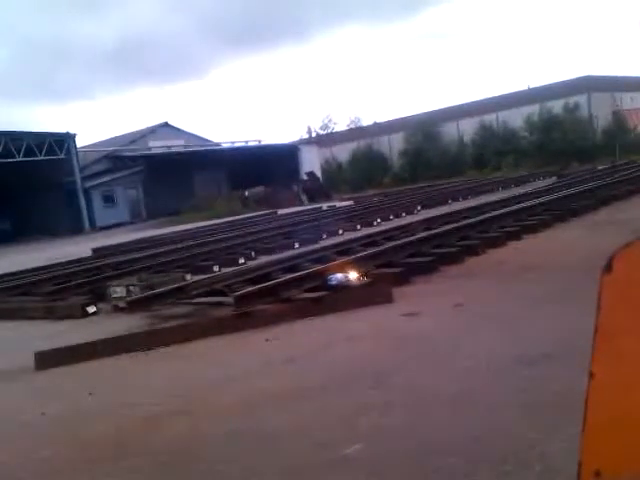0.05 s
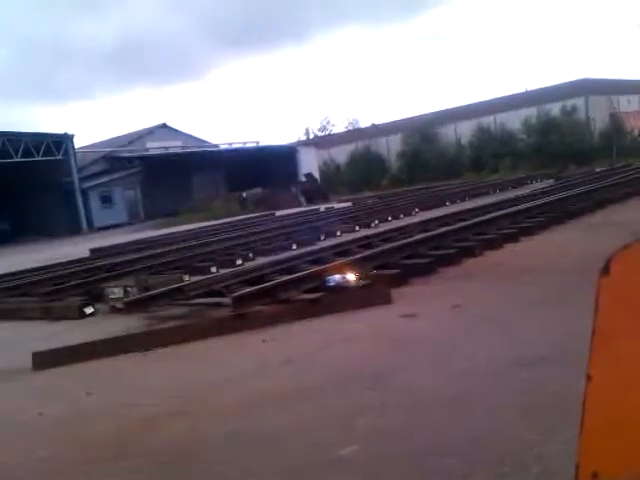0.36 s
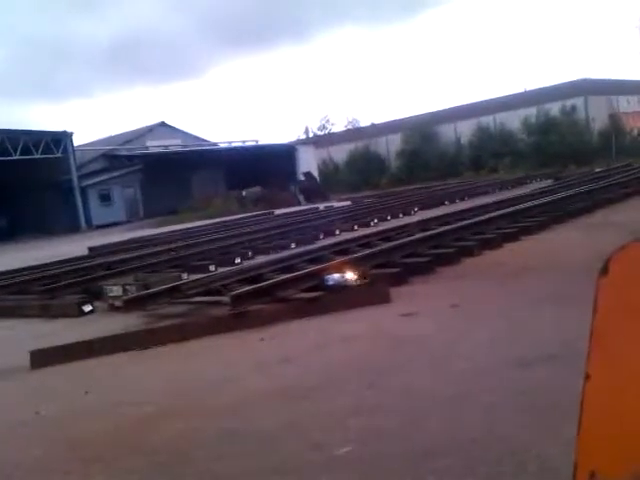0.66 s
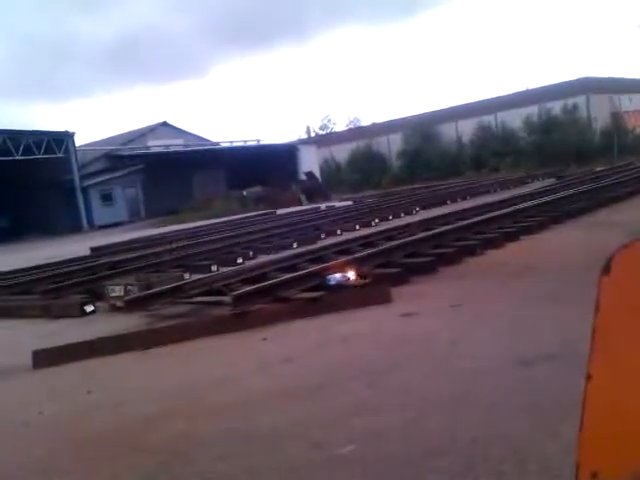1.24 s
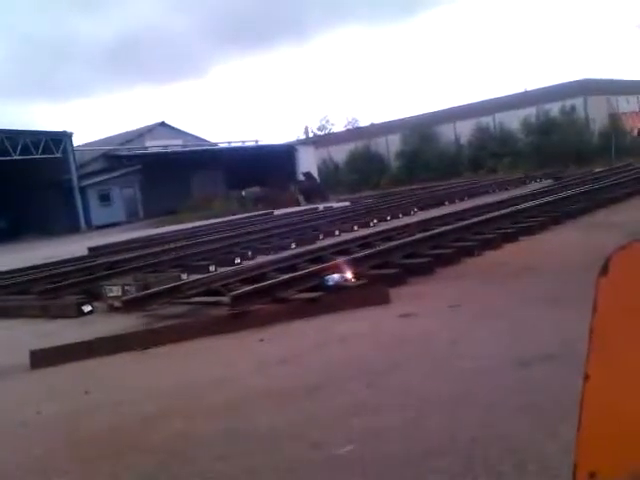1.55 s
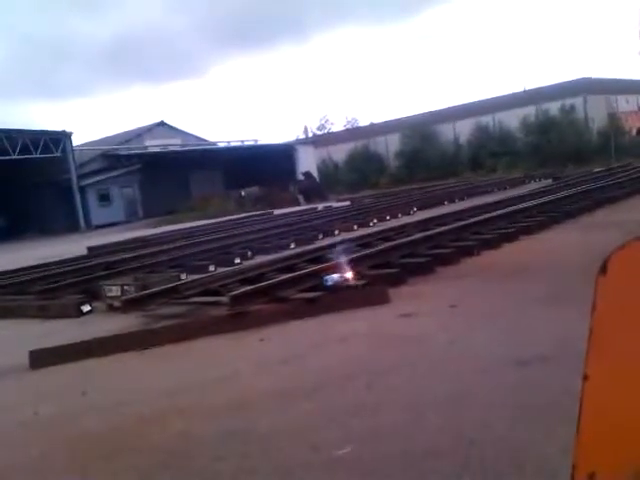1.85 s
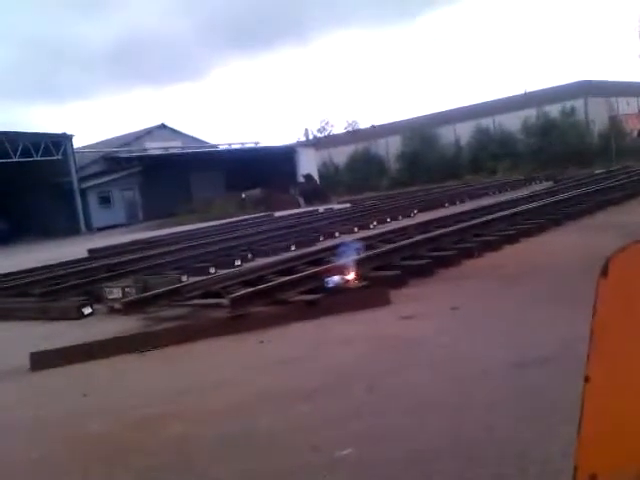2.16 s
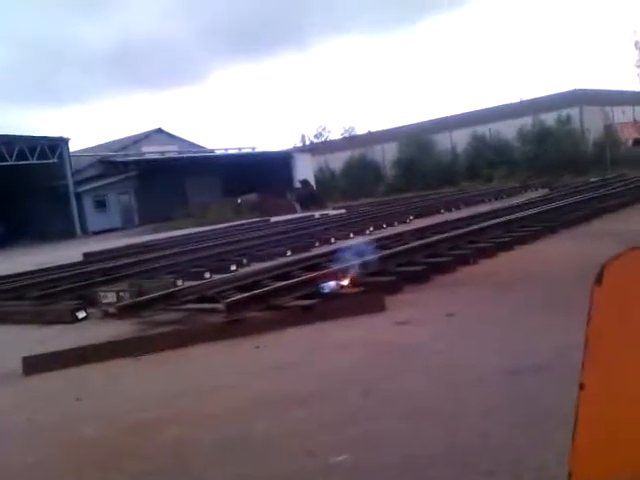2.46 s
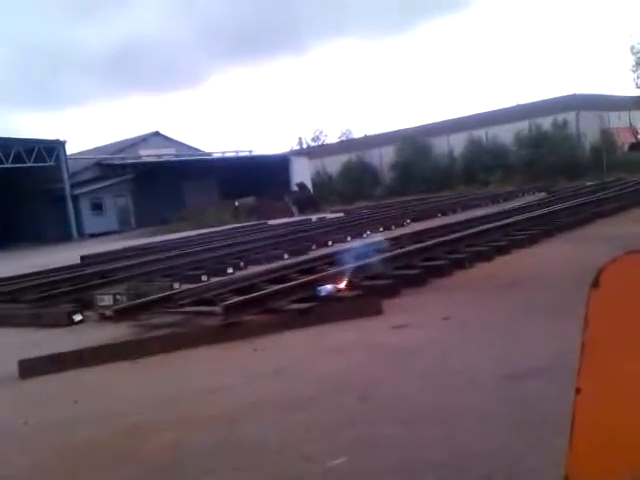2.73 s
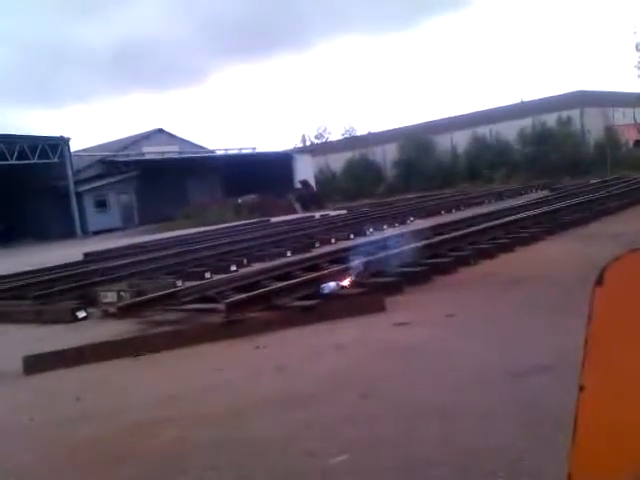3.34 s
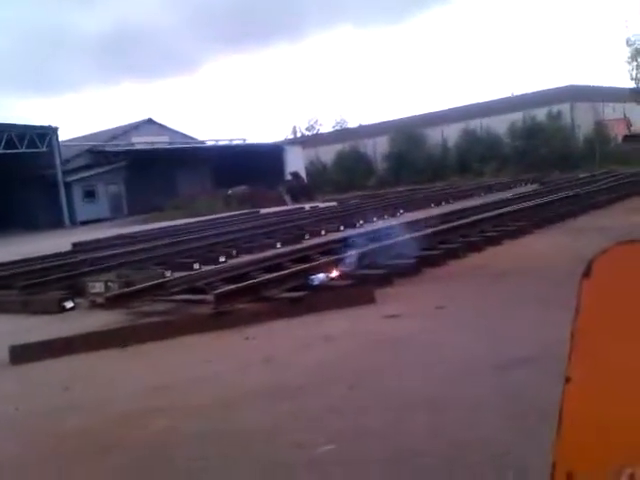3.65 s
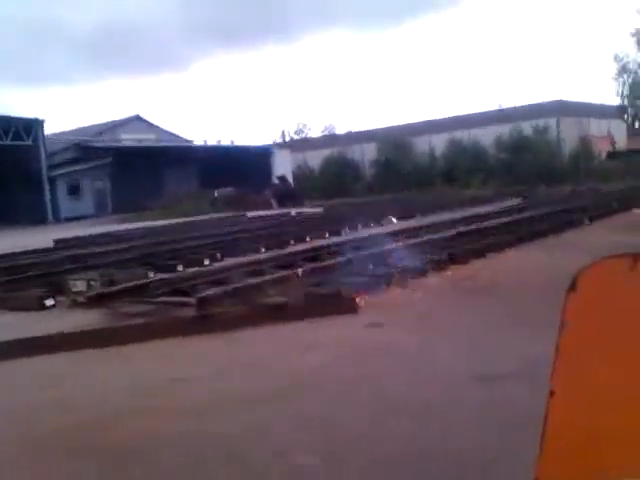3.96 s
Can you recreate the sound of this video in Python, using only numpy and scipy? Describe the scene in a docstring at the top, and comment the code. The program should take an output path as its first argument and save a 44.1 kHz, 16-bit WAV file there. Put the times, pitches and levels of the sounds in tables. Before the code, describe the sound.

A gas bottle explodes in an open yard after a quiet lead-in. From the start, its flame rushes and hums steadily over a faint rumble. A bird chirps once near 1 second, and a hiss grows slightly around 3 seconds. At about 3.6 seconds comes a very loud, sharp crack with rapid echoes and a roar sinking in pitch, still loud at 4 seconds, distorting the small, dull microphone.

```python
"""A gas bottle bursts in an open industrial yard: a sharp crack, echoes from the sheds, and a roar
that sinks in pitch as the fireball swells. Before that, its flame jet rushes and hums steadily,
the leak hisses a little more, and a bird chirps once over a distant rumble.
All is shaped noise except the bird's gliding tone. The burst overloads the small, narrow-band
microphone, and the sound clips."""
import sys
import numpy as np
from scipy import signal
from scipy.fft import rfft, irfft
from scipy.io import wavfile
from scipy.ndimage import uniform_filter1d

SR = 44100
rng = np.random.default_rng(int(sys.argv[2]) if len(sys.argv) > 2 else 0)


def output_pcm(signal):
    """Save a mono or channel-first signal as 16-bit PCM at the path in sys.argv[1].

    Samples are clipped to [-1, 1] before scaling.
    """
    pcm = np.clip(np.atleast_2d(signal).T, -1, 1) * 32767
    wavfile.write(sys.argv[1], SR, np.round(pcm).astype(np.int16))


N = 176400
T = np.arange(N) / SR
HZ = np.fft.rfftfreq(N, 1 / SR)
BURST_S = 3.6432


# Tone of the blast noise: f/Hz, relative level/dB
BLAST_SPECTRUM = [(40, -28), (160, -20), (300, -7.5), (500, 0), (800, 3.5), (1200, 0), (1850, 1),
                  (2600, -9.5), (3300, -4.5), (4000, -15.5)]
# The crack, the bang behind it and their echoes: t/s, level/dB, rise/s, 60 dB fade/s, boosted f/Hz
BANGS = [(3.6424, -5, 0.018, 0.21, 2470), (3.662, -5, 0.015, 0.28, 1040), (3.700, -8, 0.0041, 0.13, 2020),
         (3.748, -13.5, 0.01, 0.11, 2850), (3.802, -11, 0.014, 0.22, 2100), (3.840, -7, 0.01, 0.16, 1730),
         (3.884, -6.5, 0.0039, 0.17, 2020), (3.939, -8.5, 0.0084, 0.1, 2550),
         (3.963, -10.5, 0.019, 0.36, 1150)]
def cracks():
    """The bottle bursts and the sheds echo it: short blasts of noise, each with its own tone."""
    f = np.geomspace(30, 6000, 60)
    sound = np.zeros(N)
    for start, db, rise, fade, hz in BANGS:
        boost_db = 9 * np.exp(-.5 * (np.log2(f / hz) / 0.67) ** 2)  # a bump, 0.67 octaves each way
        spectrum = np.transpose([f, level_at(BLAST_SPECTRUM, f) + boost_db])
        sound += amp(db) * noise(spectrum) * swell(start, rise, fade)
    return sound


# Path of the fireball's roar: t/s, centre f/Hz, level/dB
ROAR_PATH = [(3.672, 539.9, -18.5), (3.712, 429.5, -8), (3.76, 375.3, -8), (3.80, 365, -10.5),
             (3.835, 265.3, -15), (3.875, 300.3, -15), (3.93, 304, -9), (3.97, 310.9, -10),
             (4.0, 330.2, -18)]
def fireball():
    """The swelling fireball: a dense boom whose pitch and bandwidth sink together."""
    hz, gain = glide(ROAR_PATH)
    burning = T > BURST_S
    middle_hz = np.median(hz[burning])
    boom = resonant_noise(middle_hz, width_hz=0.45 * middle_hz)
    loudness = abs(signal.hilbert(boom)) + 1e-3
    boom = unit_rms(boom / loudness ** .3)  # partly even out the level
    clock = np.cumsum(hz / middle_hz * burning) / SR  # playing slower lowers the pitch
    return np.interp(1 + clock, T, boom) * gain * burning


# Tone of the yard's reverberation: f/Hz, relative level/dB
ROLL_SPECTRUM = [(25, -32), (70, -26), (150, -17), (235, 3.5), (550, 2.5), (900, -2), (1700, -7.5),
                 (2500, -13.5), (3300, -11), (4000, -15)]
def yard_roll():
    """The burst rolls around the yard as slowly fading noise."""
    return amp(-10.5) * noise(ROLL_SPECTRUM) * swell(BURST_S, rise_s=0.065, fade_s=15)


# Tone of the flame jet in the yard: f/Hz, relative level/dB
JET_SPECTRUM = [(15, -71), (25, -52), (65, -29), (198, -19.5), (275, -9), (318, -11), (416, -2.5),
                (461, -5.5), (533, -14), (579, -9.5), (683, -11.5), (742, -11.5), (790, -12.5),
                (1050, -12.5), (1150, -16.5), (1660, -15.5), (2410, -28), (3220, -32.5), (3500, -34),
                (4550, -38), (7700, -120)]
def flame_rush():
    """The burning jet: a steady rush that flickers in small patches of pitch and time."""
    cells = signal.stft(noise(JET_SPECTRUM), nperseg=1024)[2]  # frequency by time
    patches = uniform_filter1d(rng.standard_normal(cells.shape), size=10, axis=0)
    flicker_db = 1.74 * unit_rms(uniform_filter1d(patches, size=10, axis=1))
    rush = signal.istft(cells * amp(flicker_db), nperseg=1024)[1][:N]
    return amp(-47) * unit_rms(rush)


# The jet's hollow resonances: f/Hz, width/Hz, level/dB
JET_RESONANCES = [(352, 18.5, -58.5), (420.7, 34.3, -51), (452, 28, -54), (746, 21, -63), (3294, 270, -71)]
def flame_hum():
    """The jet's resonances hum, wandering in pitch and fluttering in level together."""
    wander_hz = 7 * drift(rate_hz=3.913)
    hum = sum(amp(db) * resonant_noise(hz + wander_hz, width) for hz, width, db in JET_RESONANCES)
    flutter_db = 1.9 * drift(rate_hz=10.7)
    return hum * amp(flutter_db)


def leak():
    """Leaking gas: a hiss that grows until just before the burst, then holds."""
    full_s, rise_s = 3.35, 0.36
    growth = np.exp(np.minimum(T - full_s, 0) / rise_s)
    return amp(-62.5) * resonant_noise(2310, width_hz=1880) * growth


# Path of the bird's chirp: t/s, f/Hz, level/dB
CHIRP_PATH = [(.922, 1620, -67), (.933, 1810, -46.5), (.942, 2195, -72), (.954, 2714, -55),
              (.973, 2635, -44), (.988, 2430, -54), (.998, 2300, -64)]
def bird():
    """One raspy chirp that rises and falls, with an echo from a wall and a short tail from the yard."""
    start, end = CHIRP_PATH[0][0], CHIRP_PATH[-1][0]
    hz, gain = glide(CHIRP_PATH)
    rough_hz = hz * (1 + .022 * drift(rate_hz=230))
    phase = 2 * np.pi * np.cumsum(rough_hz) / SR
    call = np.sqrt(2) * np.sin(phase) * gain * (T > start) * (T < end)
    rasp = amp(-56.5) * resonant_noise(2900, width_hz=2000) * swell(start, rise_s=0.035, fade_s=0.6)
    echo = amp(-9) * np.interp(T - .072, T, call)  # 72 ms later
    tail = rng.standard_normal(N) * swell(0, rise_s=.01, fade_s=.3)
    yard = amp(-10) * signal.fftconvolve(call, tail / np.linalg.norm(tail))[:N]
    return call + rasp + echo + yard


# Tone of the distant rumble: f/Hz, relative level/dB
RUMBLE_SPECTRUM = [(10, -12), (30, 7), (60, 0), (110, -8.5), (300, -36)]
def yard_rumble():
    """The yard's faint, deep background noise."""
    return amp(-67.5) * noise(RUMBLE_SPECTRUM)


def amp(db):
    """Turns decibels into a gain."""
    return 10 ** (np.asarray(db) / 20)


def unit_rms(x):
    """Scales a signal to an average (rms) level of 1."""
    return x / np.sqrt(np.mean(x ** 2) + 1e-20)


def level_at(spectrum, hz):
    """Looks up a spectrum's level on a logarithmic frequency axis."""
    f, db = np.transpose(spectrum)
    return np.interp(np.log(hz + 1), np.log(f + 1), db)


def glide(path):
    """Pitch and gain at every sample, from rows of t/s, f/Hz, level/dB."""
    times, hz, db = np.transpose(path)
    return np.interp(T, times, hz), amp(np.interp(T, times, db))


def noise(spectrum):
    """Noise with the given tone, at rms 1."""
    return unit_rms(irfft(rfft(rng.standard_normal(N)) * amp(level_at(spectrum, HZ)), N))


def drift(rate_hz):
    """A smooth random wobble, mostly slower than rate_hz, at rms 1."""
    return unit_rms(irfft(rfft(rng.standard_normal(N)) / (1 + (HZ / rate_hz) ** 4), N))


def resonant_noise(hz, width_hz):
    """Turbulence in a resonance: a band of noise whose centre may move."""
    r = np.exp(-np.pi * width_hz / SR)
    white = rng.standard_normal(N) + 1j * rng.standard_normal(N)
    low = signal.lfilter([1], [1, -2 * r, r * r], white)
    shift_up = np.exp(2j * np.pi * np.cumsum(hz * np.ones(N)) / SR)
    return unit_rms((low * shift_up).real)


def swell(start, rise_s, fade_s):
    """A level that rises quickly, then falls 60 dB every fade_s."""
    age = np.maximum(T - start, 0)
    attack = np.sqrt(np.minimum(age / rise_s, 1))
    return attack * np.exp(-np.log(1000) * np.maximum(age - rise_s, 0) / fade_s)


def scene():
    """Background, flame, bird and explosion, added into one channel."""
    steady = yard_rumble() + flame_rush() + flame_hum() + leak()
    return (steady + bird() + yard_roll() + cracks() + fireball())[None]


def record(dry):
    """The small microphone loses treble and bass and clips the peaks."""
    x = signal.sosfilt(signal.butter(10, 3520, fs=SR, output="sos"), dry[0])  # cut the treble
    x = signal.oaconvolve(x, signal.firwin(321, 4500, window=("kaiser", 8), fs=SR), "same")
    drive_db, ceiling, hardness = 0.89, 0.75, 20
    x = x * amp(drive_db)
    x = x / (2 + abs(x / ceiling) ** hardness) ** (1 / hardness)  # the overloaded preamp flattens peaks
    x = signal.sosfilt(signal.butter(2, 79, "high", fs=SR, output="sos"), x)  # cut the bass
    x = np.clip(x, -.715, .715)
    return signal.oaconvolve(x, signal.firwin(511, 16000, window=("kaiser", 9), fs=SR), "same")[None]


dry = scene()
out = record(dry)
output_pcm(out)
```